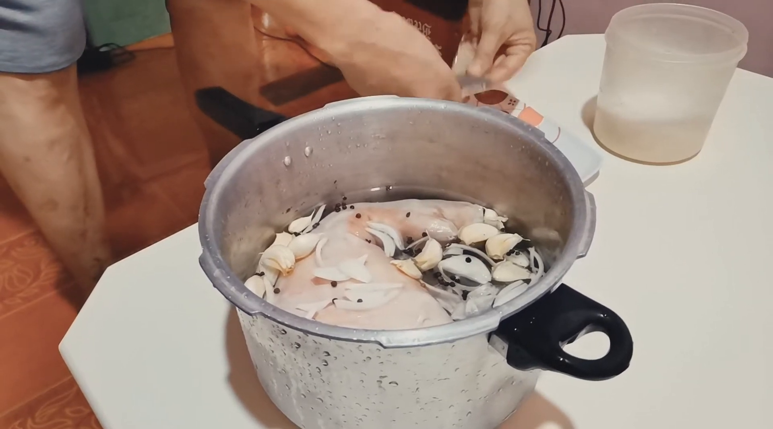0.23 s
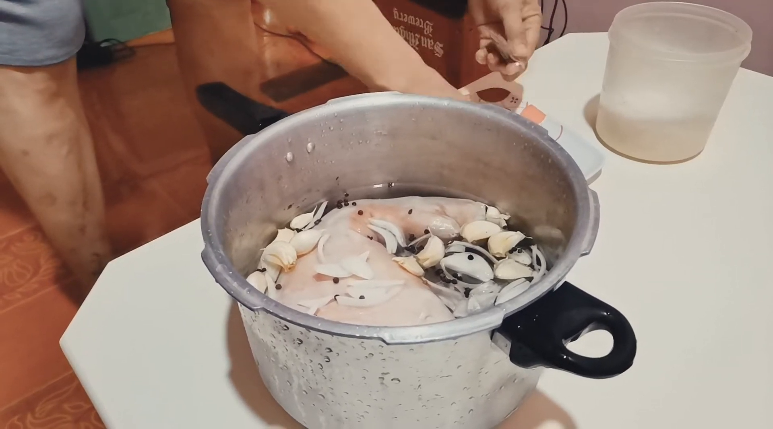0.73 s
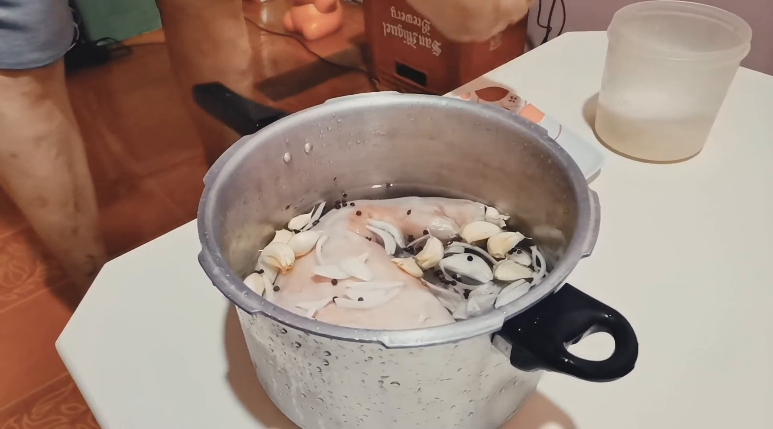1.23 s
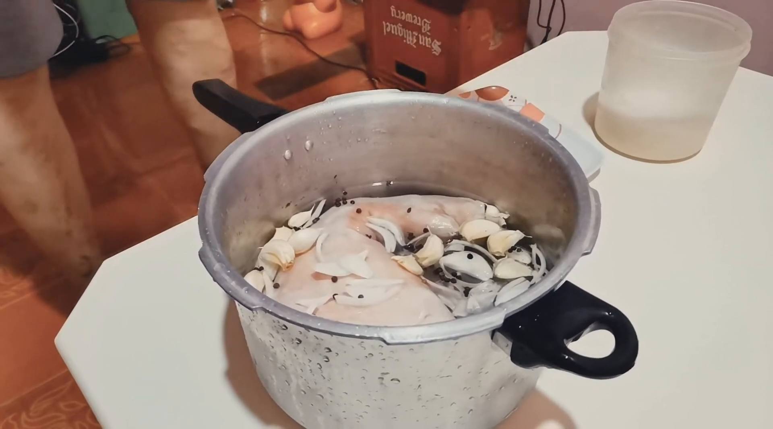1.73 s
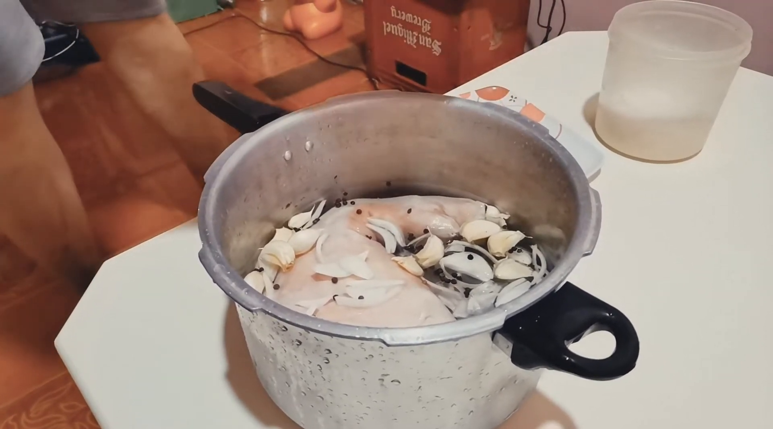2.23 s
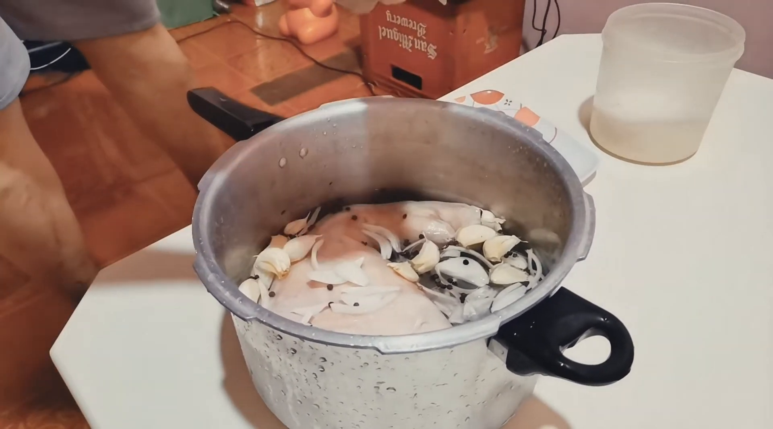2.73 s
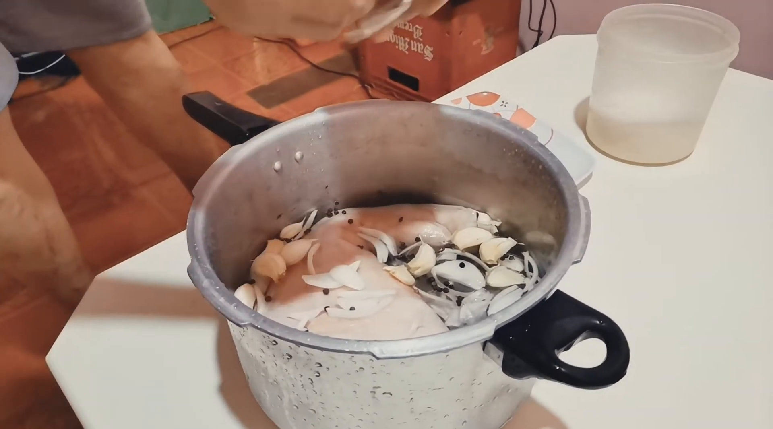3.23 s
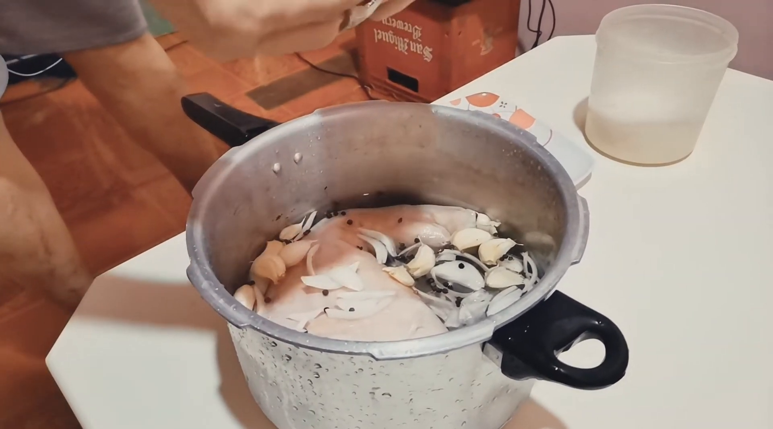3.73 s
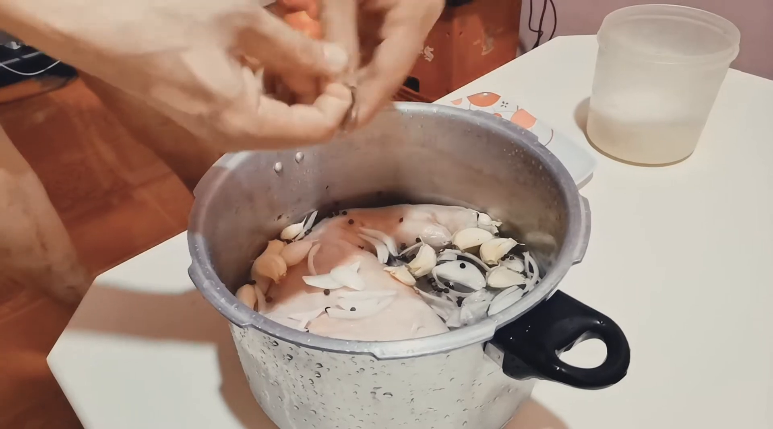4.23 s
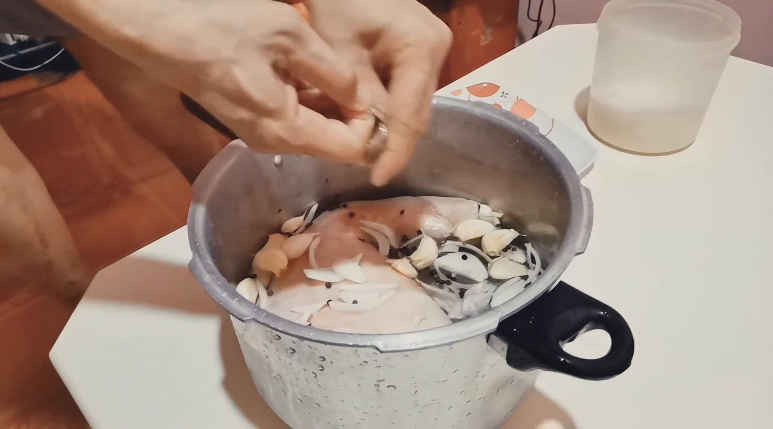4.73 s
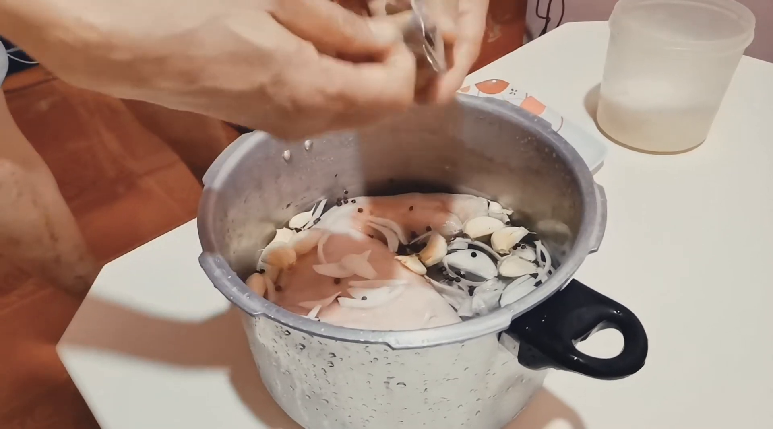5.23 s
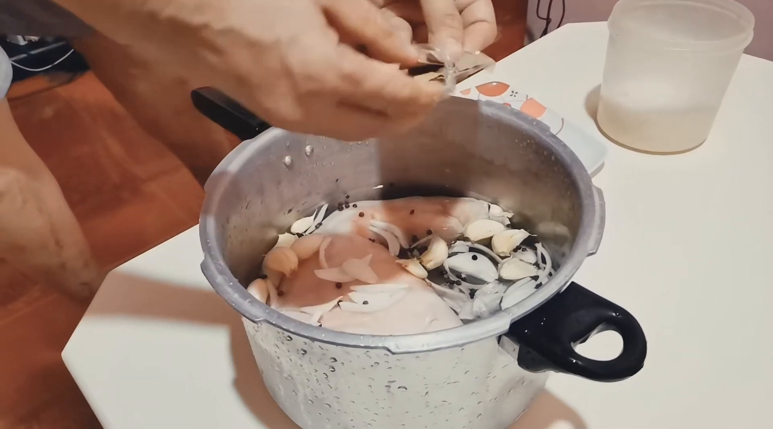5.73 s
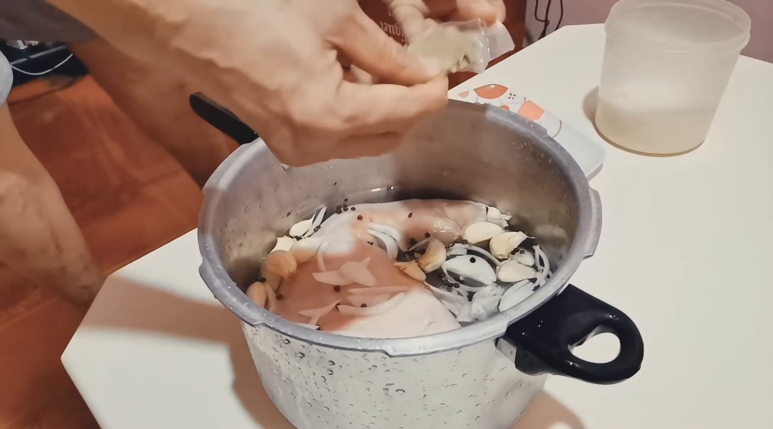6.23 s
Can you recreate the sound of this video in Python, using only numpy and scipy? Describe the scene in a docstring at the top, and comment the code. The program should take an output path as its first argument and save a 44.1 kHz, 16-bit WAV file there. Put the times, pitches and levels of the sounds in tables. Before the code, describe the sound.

Close, brittle crackles and plastic crinkles come in uneven bursts, with two soft table knocks early on and a faint low house rumble beneath.

```python
"""Dried leaves in a thin plastic sachet are picked up, crushed and crumbled by hand, close to two microphone ports.
Snaps are a sharp crack with a dying spray, crinkle is random cracks swelling with each squeeze; an open pot rings along.
The place is a hard-walled kitchen: band by band it turns sound energy into dying noise, a hissing tail.
The table is knocked twice as decaying modes, a far thin tone glides past twice,
and the house rumbles underneath as filtered noise with a faint hiss."""
import sys
import numpy as np
from scipy import signal
from scipy.fft import rfft, irfft
from scipy.io import wavfile

SR = 44100
rng = np.random.default_rng(int(sys.argv[2]) if len(sys.argv) > 2 else 0)


def amplitude_ratio(level_db):
    """Convert a level in decibels to the matching linear amplitude (field) ratio."""
    exponent = np.asarray(level_db, float) / 20
    return 10 ** exponent


def inscribe(sig):
    """Save sig as 16-bit PCM at rate SR to the path in sys.argv[1].

    A 1-D sig is mono; a 2-D sig holds one channel per row.
    Samples are clipped to [-1, 1] before scaling.
    """
    pcm = np.round(np.clip(np.atleast_2d(sig).T, -1, 1) * 32767)
    wavfile.write(sys.argv[1], SR, pcm.astype(np.int16))


N = 286209  # samples

# Single fractures, levels ahead of pot and room:
# start_s [s], level_db [dB], flake_hz [Hz], low_db [dB], treble_db [dB]
FRACTURES = [(0.0313, -29.5, 6560, 0, 0), (0.0882, -31, 4840, -5, 0), (0.1117, -26.5, 4270, -3, 9),
             (0.1526, -21, 2950, 0.5, -8), (0.334, -33, 5640, -3.5, 7), (0.3825, -22, 5650, -20, -4),
             (0.5023, -21.5, 4900, -1.5, -4), (0.601, -25.5, 4800, -2, 3), (0.6367, -30, 2970, -5, -4),
             (0.717, -14, 1680, -0.5, -16.5), (0.8195, -18, 2480, 9, -24), (1.043, -22, 4200, 7, 11),
             (1.1804, -35.5, 1890, 7, -2), (1.3075, -29, 4410, 5, 5), (1.3359, -28, 4460, -1, 0),
             (1.3554, -23, 6100, 3.5, -2), (1.484, -30, 2140, 5, 4), (1.614, -31, 6220, 0, 2),
             (1.6624, -28, 6100, 4, -1), (1.7287, -27.5, 3870, -4, 6.5), (1.8185, -28.5, 7200, 7, 4),
             (1.8287, -29.5, 2070, 7, -8), (1.8836, -24.5, 4700, -1, -1), (1.9096, -23, 2060, -11, -2.5),
             (2.0418, -25, 3120, -4, 0.5), (2.0928, -27, 2870, 4.5, -15), (2.1193, -26.5, 1880, 19, -7),
             (2.1462, -38, 2900, 5, -15), (2.169, -22, 2800, 6, -1.5), (2.2714, -31, 4040, -5, -6),
             (2.296, -29, 3840, -1, -1), (2.3344, -35.5, 2520, 12, -10), (2.351, -25, 3870, 1.5, -14),
             (2.389, -23.5, 4080, 0, -2), (2.5505, -23, 2400, 4, -1), (2.5763, -23, 2880, 3, -1),
             (2.612, -23.5, 4150, 9.5, -4), (2.6887, -27, 4150, -3, 2), (2.7086, -24.5, 4660, -9, 0),
             (2.7252, -26, 4820, -1.5, -5.5), (2.7912, -31, 4580, 10, 4), (2.9452, -31.5, 4870, -3, -6),
             (2.9652, -24.5, 6550, 13.5, 7), (3.1544, -35.5, 4870, 0, 17), (3.2042, -23.5, 4080, -11, 3),
             (3.2271, -25.5, 4930, -3, 5), (3.3368, -38, 2800, 13, -10), (3.3704, -28, 2850, 9, -5),
             (3.4186, -25.5, 2740, -2, 2), (3.471, -27.5, 6100, -5, -4), (3.5034, -25.5, 6760, -10, 5),
             (3.5816, -26.5, 3870, 1, 7), (3.685, -23, 6500, -8, -4), (3.7556, -24.5, 3140, -12, -7),
             (3.7845, -25, 2360, 6, -1.5), (3.8167, -28.5, 4820, 9, 2), (3.8607, -22.5, 6600, -2.5, -10),
             (3.905, -30.5, 6160, -16, 15), (3.9663, -30.5, 3660, -10, -8), (3.9916, -30, 7740, -4, 2),
             (4.0151, -23, 4460, -8, -1), (4.1594, -36, 3670, -11, 3), (4.2233, -29.5, 6550, 9, 4),
             (4.2664, -30.5, 3260, -10, -1), (4.313, -23.5, 3680, 8, -4), (4.3787, -27, 4820, 13, -2),
             (4.4474, -27.5, 4770, -1, -6), (4.4734, -25, 4550, -1, -2), (4.5246, -30, 6700, -6, 7),
             (4.5486, -29, 4550, -2, 7), (4.6084, -25.5, 5290, 0, 8), (4.6631, -28, 5600, -2, 8),
             (4.6855, -27, 4970, -11, 2), (4.8643, -31, 3820, -15, 1.5), (4.9792, -25, 3170, -2, -8),
             (5.2936, -31, 2830, -6, -8), (5.3183, -25.5, 2860, -8, -15), (5.367, -30, 2810, 8, -9),
             (5.3961, -26, 3670, 8, 3), (5.611, -28, 2850, 4, -9.5), (5.6301, -50, 2790, 5, -10),
             (5.692, -39, 2940, 4, -6), (5.7664, -34.5, 2520, -4, -8), (5.793, -32.5, 6360, 0, 4),
             (5.8647, -37, 2950, -6, 0), (5.877, -25.5, 4600, 10, 7), (5.9665, -30, 4570, 4, -4),
             (5.9923, -31, 3090, 9, 0), (6.0097, -27, 2900, 0, 7), (6.1171, -24.5, 2850, 5, 1),
             (6.131, -24, 4380, 2, -6), (6.2068, -25.5, 3610, -9, 1), (6.2925, -25, 4440, 12, 1.5),
             (6.3913, -28, 4490, -10, -2), (6.4268, -33, 4020, -2, 8)]


def snaps():
    """Each fracture: a sharp first crack, then a dying spray; the flake rings briefly at its own pitch."""
    tear_s, top_over_treble_db = 0.0052, 6
    lead = 24  # samples kept free ahead of the crack
    t = np.arange(2048) / SR
    out = np.zeros(N + len(t))
    hz = np.fft.rfftfreq(len(t), 1 / SR)
    leaf = leaf_colour(hz) / (1 + (1000 / (hz + 1)) ** 5)
    below_2k, below_5k, below_9k = [1 / (1 + (hz / edge) ** 8) for edge in (2000, 5000, 9000)]
    sprays = np.clip(rng.standard_normal((len(FRACTURES), len(t))), -2.1, 2.1) ** 3
    for (start_s, level_db, flake_hz, low_db, treble_db), spray in zip(FRACTURES, sprays):
        spray = 0.1 * spray * np.exp(-t / tear_s)
        spray[lead] += 3.0  # the first crack
        spray[:lead] = 0
        ring = 1 + amplitude_ratio(5) / (1 + ((hz - flake_hz) / (0.1 * flake_hz)) ** 2)
        low_and_middle = below_2k * amplitude_ratio(low_db) + below_5k - below_2k
        treble_and_top = below_9k - below_5k + (1 - below_9k) * amplitude_ratio(top_over_treble_db)
        colour = low_and_middle + amplitude_ratio(treble_db) * treble_and_top
        snap = irfft(rfft(spray) * leaf * colour * ring)
        snap = snap / np.sqrt(np.sum(snap ** 2) / 4.53)  # equal energy
        at = max(round(start_s * SR) - lead, 0)
        out[at:at + len(t)] += amplitude_ratio(level_db) * snap
    return out[:N]


# Slow colour of the leaves and the pot:
# time_s [s], body_over_low_db [dB], top_over_treble_db [dB], pot_ring_db [dB]
SLOW_COLOUR = [(0, -4, -4, -2.5), (0.4, 0.5, -3, -7), (0.7, -7, -4, -5.5), (1.2, -5, -2.5, -19.5),
               (1.8, -5, -3, -7), (2.2, -2.5, -1.5, -0.5), (2.9, -7, -1.5, -4), (3.5, -6, -1.5, -3),
               (4.0, -3.5, -1.5, -7), (4.4, -2.5, -3.5, -5.5), (4.9, -2.5, -4, -8), (5.4, -1, -4, -4.5),
               (5.9, -2.5, -3, -2), (6.2, -0.5, -3, -4.5), (6.49, -2, -0.5, -7)]


def crinkle():
    """Random cracks of very uneven size come in clumps; thick flakes weigh the low parts, thin ones the top."""
    cracks_per_s, clump_db, clump_points_per_s = 900, 4.0, 30  # the rate swings about the first value
    middle, low, treble = squeezes()
    body_db, top_db, _ = in_time(SLOW_COLOUR)
    sizes = amplitude_ratio(5.7 * np.minimum(rng.exponential(1, N), 3.5)) * rng.choice([-1, 1], N)
    chance = cracks_per_s * amplitude_ratio(clump_db * drift(clump_points_per_s)) / SR
    cracks = sizes * (rng.random(N) < chance)
    leaf = irfft(rfft(cracks) * leaf_colour(np.fft.rfftfreq(N, 1 / SR)), N)
    parts_hz = [(400, 1000), (1000, 2000), (2000, 5000), (5000, 9000), (9000, 16500)]
    gains = [low * amplitude_ratio(body_db), low, middle, treble, treble * amplitude_ratio(top_db)]
    return sum(gain * rms_one(band(leaf, *edges)) for edges, gain in zip(parts_hz, gains))


# Squeezes of the fingers, low and treble parts relative to the level:
# full_s [s], rise_s [s], hold_s [s], level_db [dB], low_db [dB], treble_db [dB]
FINGER_SQUEEZES = [(0.024, 0.075, 0.013, -48.5, -9, -0.5), (0.088, 0.003, 0.03, -52, -11, -1),
                   (0.138, 0.091, 0.0066, -50, -12, -15), (0.328, 0.003, 0.041, -55, -4, 4),
                   (0.392, 0.043, 0.036, -48, -7.5, 0.5), (0.5, 0.0017, 0.008, -39.5, -23, -2.0),
                   (0.545, 0.017, 0.02, -52, -7, -0.5), (0.597, 0.048, 0.01, -58.5, -19, 4),
                   (0.626, 0.004, 0.008, -58, -19, 4), (0.715, 0.0045, 0.01, -37.5, -1, -11.5),
                   (0.816, 0.0042, 0.02, -38.5, -2.5, -14), (0.874, 0.038, 0.048, -41, -5.5, -2),
                   (1.047, 0.0027, 0.0055, -47.5, -26, -1.5), (1.073, 0.017, 0.018, -54.5, -2, 1),
                   (1.182, 0.024, 0.033, -62, 8, -10), (1.339, 0.053, 0.0091, -46, -4.0, -0.5),
                   (1.49, 0.003, 0.03, -56, -9, 3), (1.616, 0.004, 0.005, -58, 2.5, -4),
                   (1.665, 0.013, 0.055, -54, -8.5, 3), (1.83, 0.005, 0.04, -59, -17, 4),
                   (1.894, 0.06, 0.014, -45.5, -15, 0), (2.043, 0.0033, 0.065, -48.5, -2.5, -1),
                   (2.171, 0.0026, 0.0042, -55.5, 2, -1.0), (2.363, 0.089, 0.11, -45.5, -11.5, 1),
                   (2.542, 0.015, 0.1, -47.5, -6.5, -2.5), (2.716, 0.053, 0.021, -53, -19, 3),
                   (2.785, 0.033, 0.043, -49, -9.5, 1.5), (2.958, 0.024, 0.019, -47, -5.5, 0),
                   (3.016, 0.02, 0.066, -52.5, -6.5, 0.5), (3.193, 0.0032, 0.028, -55, -15.0, 3),
                   (3.275, 0.0086, 0.011, -45, -3.5, -1.5), (3.374, 0.04, 0.073, -49, -10.5, -0.5),
                   (3.502, 0.008, 0.11, -54.0, -16, 2.0), (3.662, 0.0057, 0.005, -53.5, -19, 4.0),
                   (3.745, 0.078, 0.056, -50, -14, -0.5), (3.84, 0.072, 0.026, -52, -18, 3.5),
                   (4.012, 0.059, 0.022, -50.5, -19, 3), (4.15, 0.013, 0.01, -55, -6, -1.0),
                   (4.224, 0.005, 0.005, -50.5, -2.5, -2), (4.316, 0.067, 0.006, -45, -8.5, -1.5),
                   (4.371, 0.01, 0.042, -52, -6.5, 0), (4.444, 0.23, 0.019, -52.5, -14, 2),
                   (4.551, 0.024, 0.041, -51.5, -27, -0.5), (4.662, 0.003, 0.036, -54, -25, 1.5),
                   (4.775, 0.029, 0.026, -55, -8, 1), (4.857, 0.003, 0.025, -58.5, -5, 5),
                   (4.972, 0.0054, 0.098, -46.5, -7.5, 0), (5.091, 0.02, 0.034, -53.5, -5.5, -4),
                   (5.304, 0.053, 0.0074, -48, -6, -3), (5.374, 0.023, 0.057, -44, -7.5, -2),
                   (5.527, 0.018, 0.012, -54, -10, -4), (5.596, 0.12, 0.012, -51.5, -4, -0.5),
                   (5.689, 0.005, 0.025, -54.5, 0, -2), (5.76, 0.094, 0.033, -57, -4, -2.0),
                   (5.871, 0.0093, 0.005, -46, -6.5, -1.5), (5.952, 0.049, 0.005, -49.0, -7, -1.5),
                   (5.996, 0.018, 0.039, -51, -5.5, -2), (6.127, 0.035, 0.023, -41, -7.5, -1),
                   (6.204, 0.008, 0.014, -45.5, -2.5, -1.5), (6.284, 0.01, 0.005, -47.5, -7.0, -1),
                   (6.39, 0.003, 0.034, -48.5, -3.5, -3.5), (6.417, 0.011, 0.017, -54.5, -4, 0.5)]


def squeezes():
    """Each squeeze climbs, holds and lets go; returns the gains of the middle, low and treble parts."""
    climb_db, let_go_db_per_s = 13, 330  # the climb is per rise_s
    rest_db = -70  # crinkle of idle fingers
    t = np.arange(0, N + 32, 32) / SR
    full_s, rise_s, hold_s, level_db, low_db, treble_db = np.transpose(FINGER_SQUEEZES)[:, :, None]
    climb = climb_db * np.maximum(full_s - t, 0) / np.maximum(rise_s, .002)
    fall = let_go_db_per_s * np.maximum(t - full_s - np.maximum(hold_s, 0), 0)
    shape_db = level_db - climb - fall
    gains = []
    for part_db in (0, low_db, treble_db):
        power = np.sum(amplitude_ratio(shape_db + part_db) ** 2, axis=0) + amplitude_ratio(rest_db) ** 2
        gains.append(np.interp(np.arange(N) / SR, t, np.sqrt(power)))
    return gains


# Colour of the cracking leaf: pitch_hz [Hz], level_db [dB]
LEAF_SPECTRUM = [(290, -72), (500, -11.5), (649, -9), (805, -7.5), (958, 7.5), (1140, -10), (1390, -5),
                 (2060, -0.5), (3130, -1.5), (4760, 1.5), (9260, -2), (10100, -6), (12200, -9),
                 (13500, -11.5), (15800, -15.5)]


def leaf_colour(hz):
    """Gain of the cracks by frequency."""
    return amplitude_ratio(at_hz(LEAF_SPECTRUM, hz))


# Resonances of the open pot below the hands: pitch_hz [Hz], width_hz [Hz], level_db [dB, before the slow colour]
POT_RINGS = [(1310, 150, -2), (2850, 140, -1), (4550, 320, -1), (6250, 370, -2)]


def pot(x):
    """The open pot rings along through two-pole resonators, more as the hands come over it."""
    out = 0
    for hz, width_hz, level_db in POT_RINGS:
        r = np.exp(-np.pi * width_hz / SR)
        forward = [(1 - r * r) / 2, 0, (r * r - 1) / 2]
        back = [1, -2 * r * np.cos(2 * np.pi * hz / SR), r * r]
        out = out + amplitude_ratio(level_db) * signal.lfilter(forward, back, x + 1e-18)
    ring_db = in_time(SLOW_COLOUR)[2]
    return x + amplitude_ratio(ring_db) * out


def nearby(x, count, near_db, near_s, wall_db, wall_s):
    """Direct path plus quick echoes off fingers, pot and table; the hands move, so paths fade over every 30 ms."""
    t = np.arange(4096) / SR
    walls = rng.standard_normal((count, 2, len(t))) * np.exp(-t / wall_s) * (t > .003)
    walls = rms_one(walls) / np.sqrt(len(t))
    paths = rng.standard_normal((count, 2, len(t)))
    paths = paths * (rng.random((count, 2, len(t))) < .05) * np.exp(-t / near_s)  # sparse echoes
    paths *= amplitude_ratio(near_db) / np.sqrt(np.sum(paths ** 2, axis=2, keepdims=True))
    paths += amplitude_ratio(wall_db) * walls  # the first walls answer with the crack's own fine colour
    for k, lags in enumerate(rng.integers(0, 9, (count, 2)) + [0, 3]):
        paths[k, [0, 1], lags] += 1  # direct path to each port
    turn, out = np.arange(N) / SR / .03 % count, 0  # the set of paths comes round again
    for k, path in enumerate(paths):
        apart = np.abs((turn - k + count / 2) % count - count / 2)
        share = x * np.cos(np.pi / 2 * np.minimum(apart, 1))
        out = out + signal.oaconvolve(share[None], path)[:, :N]
    return out


# Knuckle on the table: start_s [s], level_db [dB, before the mode levels]
TABLE_KNOCKS = [(0.717, -30), (0.824, -31)]
# Modes of the table top: pitch_hz [Hz], level_db [dB, added to the knock], t60_s [s]
TABLE_MODES = [(223.4, 3.5, 0.12), (200, -20, 0.049), (270, -1.5, 0.095), (157, -17, 0.09), (636, -7, 0.12)]


def knocks():
    """A soft blow sets the table modes ringing; each swells in and dies exponentially."""
    t, out = np.arange(N) / SR, 0
    for start_s, knock_db in TABLE_KNOCKS:
        since = np.maximum(t - start_s, 0)
        swell = 1 - np.exp(-since / 0.0063)
        for hz, level_db, t60_s in TABLE_MODES:
            decay = amplitude_ratio(knock_db + level_db - 60 * since / t60_s)
            out = out + decay * swell * np.sin(2 * np.pi * hz * since)
    return out


# Thin tone from far off, pitch and level about which it wavers:
# start_s [s], length_s [s], first_hz [Hz], last_hz [Hz], level_db [dB]
FAR_TONES = [(1.577, 0.141, 1330, 1420, -54), (3.07, 0.186, 1186, 1223, -58)]


def far_tone():
    """A thin gliding tone, faded in and out, wavering on its way through the air."""
    out, t = 0, np.arange(N) / SR
    for start_s, length_s, first_hz, last_hz, level_db in FAR_TONES:
        end_s = start_s + length_s
        hz = np.interp(t, [start_s, end_s], [first_hz, last_hz])
        fade = np.clip(np.minimum(t - start_s, end_s - t) / 0.033, 0, 1)
        level = amplitude_ratio(level_db + 3.1 * drift(40))
        phase = 2 * np.pi * np.cumsum(hz + 30 * drift(35.93)) / SR
        out = out + fade * level * np.sin(phase)
    return out


# Reverberation of the kitchen: pitch_hz [Hz], t60_s [s]
KITCHEN_T60 = [(300, 0.42), (1500, 0.26), (4000, 0.26), (9000, 0.26), (15000, 0.081)]
# Likeness of left and right in room and rumble: pitch_hz [Hz], likeness [-1 to 1]
PORT_LIKENESS = [(60, 0.74), (180, 0.83), (550, 0.8), (1650, 0), (4970, 0.17), (15000, 0)]


def kitchen(x, build_s):
    """The walls store the energy of each third-octave and give it back as ever-new noise that dies away."""
    edges, out = 140 * 2 ** np.arange(0, 7, 1 / 3), 0
    white = rng.standard_normal((2, 2, N))
    for k, (low, high) in enumerate(zip(edges, edges[1:])):
        hz = np.sqrt(low * high)
        keep = amplitude_ratio(-120 / (at_hz(KITCHEN_T60, hz) * SR))  # energy left after one sample
        fill = np.exp(-1 / (build_s * SR))
        poles = np.convolve([1, -keep], [1, -fill])
        stored = signal.lfilter([(1 - keep) * (1 - fill)], poles, band(x, low, high) ** 2)
        mid, side = rms_one(band(white[k % 2], low, high))
        out = out + np.sqrt(np.abs(stored) / 2) * spread(mid, side, hz)
    return out


# Spectrum of the rumble, shape only: pitch_hz [Hz], density_db [dB per Hz]
RUMBLE_SPECTRUM = [(12, -27), (20, 1.5), (45, 0.5), (86, -4), (151, 1.5), (455, -12.5), (728, -9),
                   (972, -25), (1210, -32), (1500, -47), (1950, -52), (3300, -120)]
# Course of the rumble: time_s [s], deep_db [dB], upper_db [dB]
RUMBLE_COURSE = [(0.0, -59, -53.5), (0.72, -58, -62), (0.99, -63, -60), (1.55, -57.5, -55),
                 (1.92, -64, -58.5), (2.22, -56.5, -58.5), (2.53, -67, -62.5), (3.03, -63.5, -62.5),
                 (3.45, -57.5, -62.5), (3.87, -70, -70.5), (4.1, -68, -67.5), (4.28, -58, -62),
                 (4.75, -73, -66.5), (5.08, -58.5, -63), (5.6, -57.5, -60), (5.69, -58.5, -55.5),
                 (6.14, -66.5, -65.5), (6.49, -65, -61.5)]
# Spectrum of the hiss, shape only: pitch_hz [Hz], density_db [dB per Hz]
HISS_SPECTRUM = [(240, -40), (400, -1), (1210, -5), (4830, 7), (9220, -34), (10300, -12), (13500, -32),
                 (15800, -18)]


def rumble():
    """The house rumbles in lumps, deep and higher parts on their own, over a faint even hiss."""
    lumps_db, hiss_db = 4.5, -70
    deep_db, upper_db = in_time(RUMBLE_COURSE)
    deep = rms_one(band(steady(RUMBLE_SPECTRUM), 12, 75)) * amplitude_ratio(deep_db + lumps_db * drift(6))
    upper = rms_one(band(steady(RUMBLE_SPECTRUM), 75, 3000)) * amplitude_ratio(upper_db + lumps_db * drift(9))
    return deep + upper + amplitude_ratio(hiss_db) * steady(HISS_SPECTRUM)


def steady(spectrum):
    """Stereo noise of rms 1, most alike at the two ports in the bass."""
    hz = np.fft.rfftfreq(N, 1 / SR)
    mid, side = rfft(rng.standard_normal((2, N))) * amplitude_ratio(at_hz(spectrum, hz))
    return rms_one(irfft(spread(mid, side, hz), N))


def spread(mid, side, hz):
    """Mix two independent noises to left and right with the likeness of the ports."""
    alike = np.clip(at_hz(PORT_LIKENESS, hz), -.99, .99)
    return np.sqrt(1 + alike) * mid + np.sqrt(1 - alike) * side * [[1], [-1]]


def drift(rate):
    """Slow chance: random points of spread 1, rate of them a second, joined by lines."""
    points = rng.standard_normal(int(N / SR * rate) + 2)
    return np.interp(np.arange(N) / SR * rate, np.arange(len(points)), points)


def rms_one(x):
    """Scale to rms 1."""
    return x / np.sqrt(np.mean(x ** 2) + 1e-20)


def in_time(rows):
    """Join curve rows by straight lines, one value a sample."""
    s, *columns = np.transpose(rows)
    return [np.interp(np.arange(N) / SR, s, c) for c in columns]


def at_hz(points, hz):
    """Read a spectrum on a log-frequency axis."""
    points_hz, values = np.transpose(points)
    return np.interp(np.log(np.maximum(hz, 1)), np.log(points_hz), values)


def band(x, low_hz, high_hz):
    """Butterworth band-pass."""
    return signal.sosfilt(signal.butter(2, [low_hz, high_hz], "band", fs=SR, output="sos"), x + 1e-18)


# Place of the hands before the ports: time_s [s], left_over_right_db [dB]
HAND_PLACE = [(0.0, 1.5), (0.23, -3.5), (0.69, 1.5), (1.43, 0), (1.68, 0.5), (1.99, -0.5), (2.26, 1),
              (3.63, -2), (3.8, -1), (4.47, -2.5), (4.7, -1.5), (5.57, -5), (6.22, -5), (6.49, -3)]


def scene():
    """Leaves move between the ports; table and far tone stay put."""
    side = amplitude_ratio(in_time(HAND_PLACE)[0] * [[.5], [-.5]])
    leaves = pot(crinkle() + snaps())
    still = knocks() + far_tone()
    close = amplitude_ratio(1.0) * nearby(leaves, count=10, near_db=3.0, near_s=0.0017, wall_db=2.0, wall_s=0.03)
    leaves_room = amplitude_ratio(5.0) * kitchen(leaves, build_s=0.0073)
    still_room = amplitude_ratio(-3) * kitchen(still, build_s=0.0035)
    return side * (close + leaves_room) + still + still_room + rumble()


# The two microphone ports differ: pitch_hz [Hz], left_over_right_db [dB]
PORT_COLOUR = [(60, 3.5), (92, 4), (140, 2.5), (210, 3), (330, 3), (500, 3), (770, 3), (1170, 2.5),
               (1790, 1), (2740, 1.5), (4190, -1.5), (6410, 2.5), (9810, 2.5), (15000, 11)]


def roll_off(x):
    """The treble ends steeply here."""
    return signal.sosfilt(signal.butter(12, 16990, fs=SR, output="sos"), x)


def record(dry):
    """Each microphone port has its own colour; a dull step lies at 9.7-12.6 kHz and the top is cut."""
    hz = np.fft.rfftfreq(N, 1 / SR)
    port_db = at_hz(PORT_COLOUR, hz) * [[.5], [-.5]]
    dull_db = 6.7 * ((hz > 9700) & (hz < 12600))
    top_cut_db = 30 * (hz > 15800)
    mix = irfft(rfft(dry) * amplitude_ratio(port_db - dull_db - top_cut_db), N)
    return roll_off(mix)


dry = scene()
out = record(dry)
inscribe(out)
```